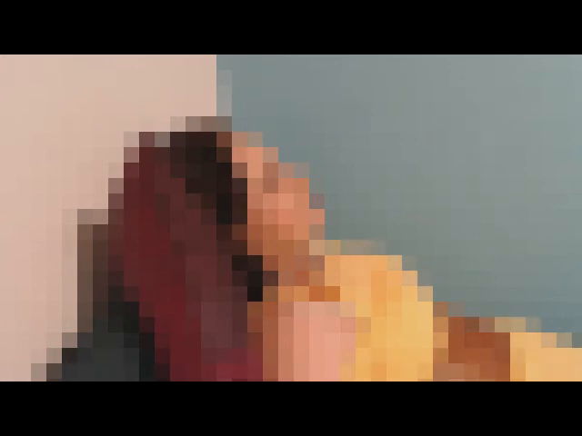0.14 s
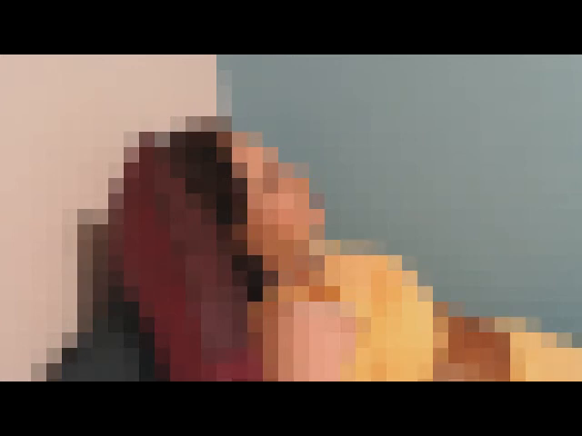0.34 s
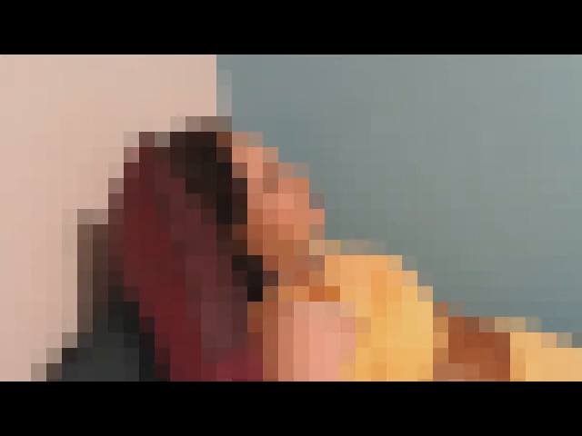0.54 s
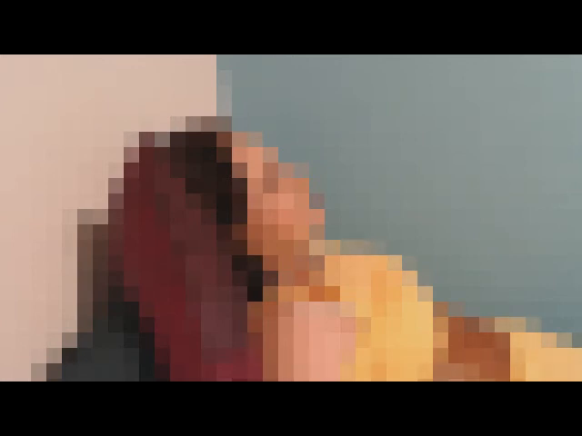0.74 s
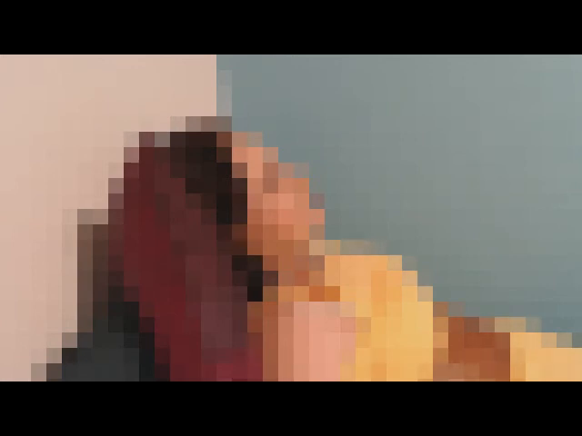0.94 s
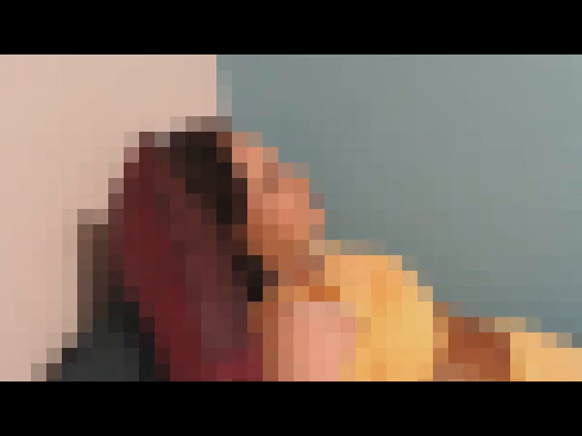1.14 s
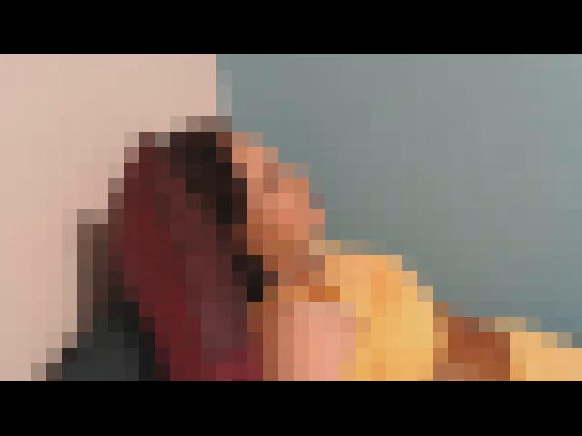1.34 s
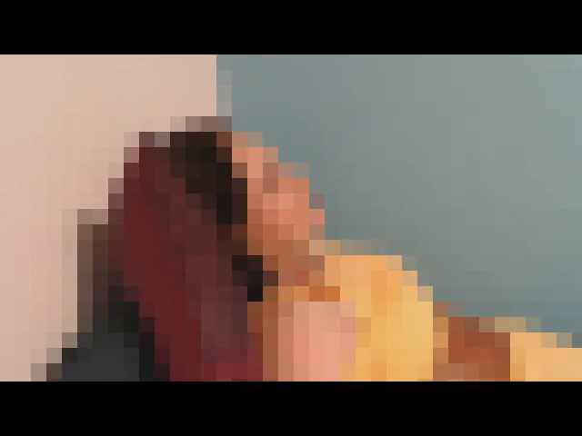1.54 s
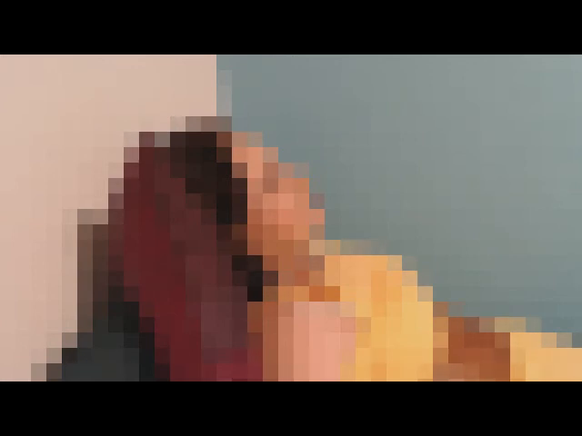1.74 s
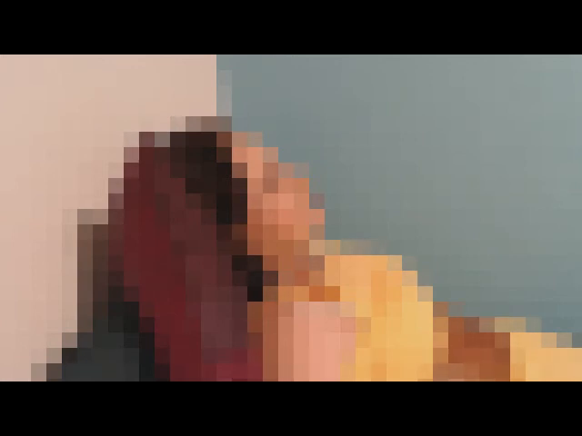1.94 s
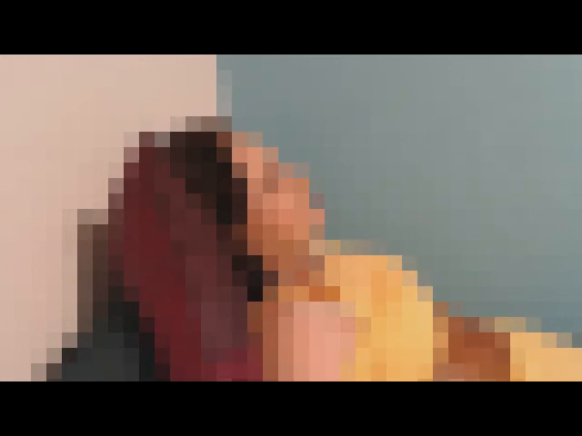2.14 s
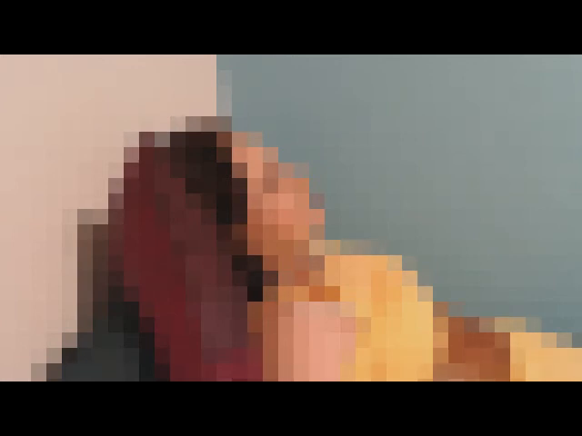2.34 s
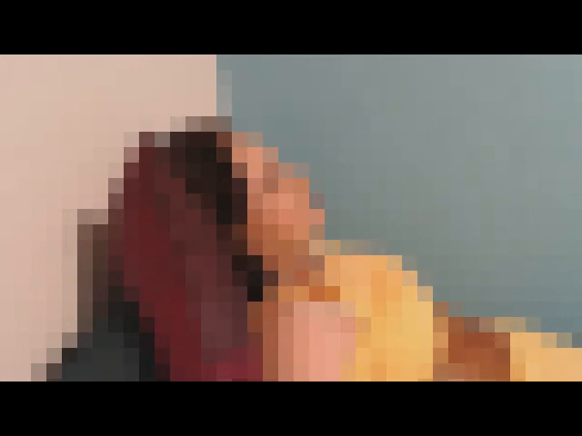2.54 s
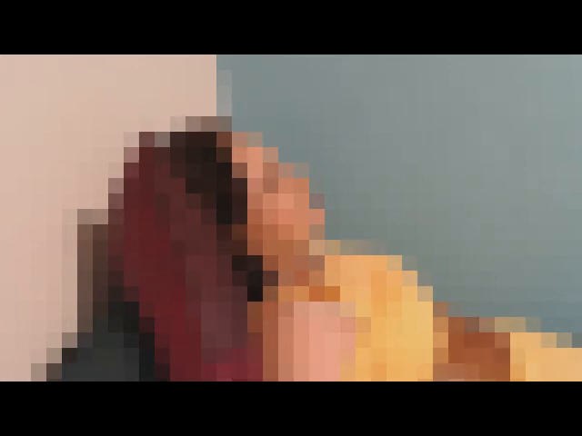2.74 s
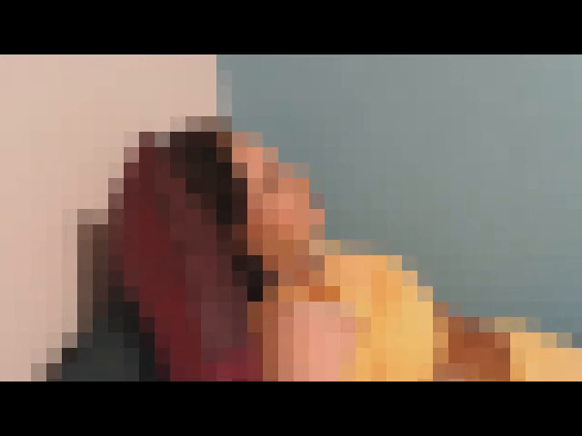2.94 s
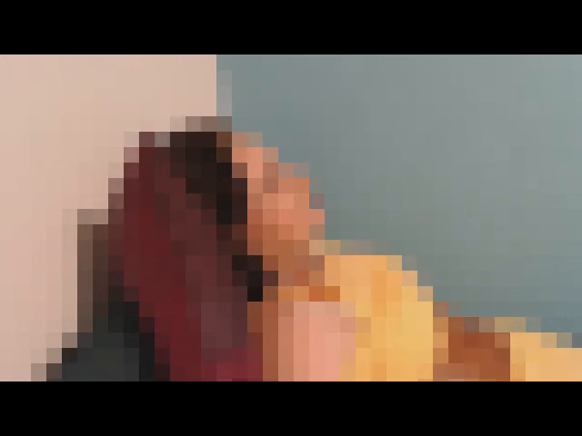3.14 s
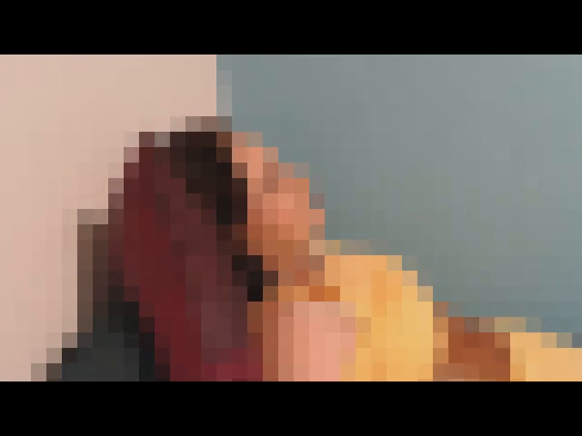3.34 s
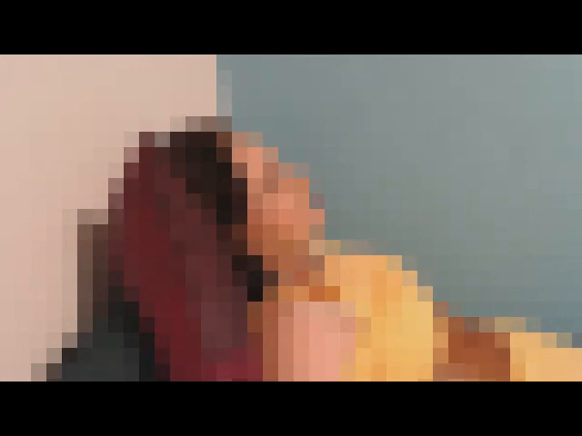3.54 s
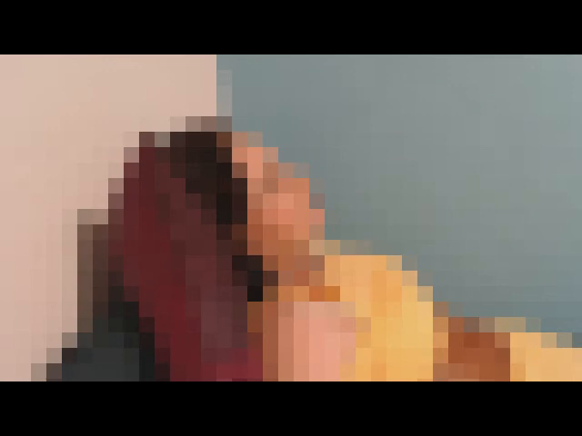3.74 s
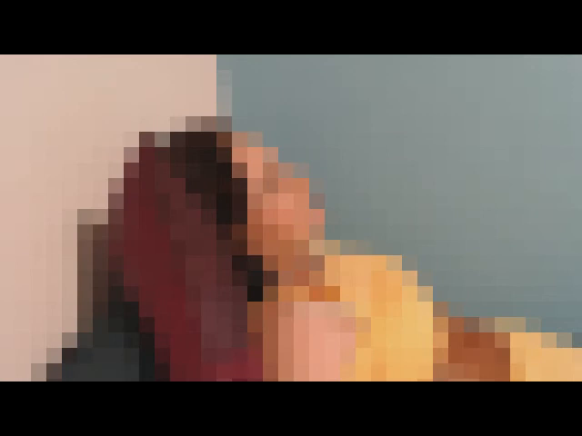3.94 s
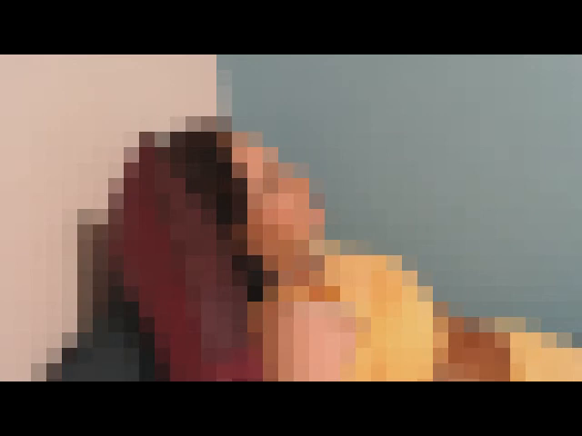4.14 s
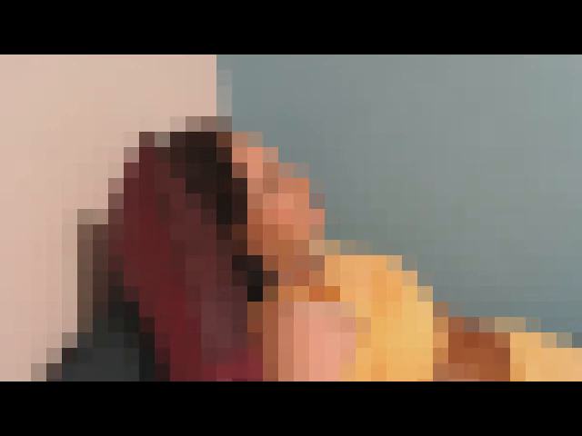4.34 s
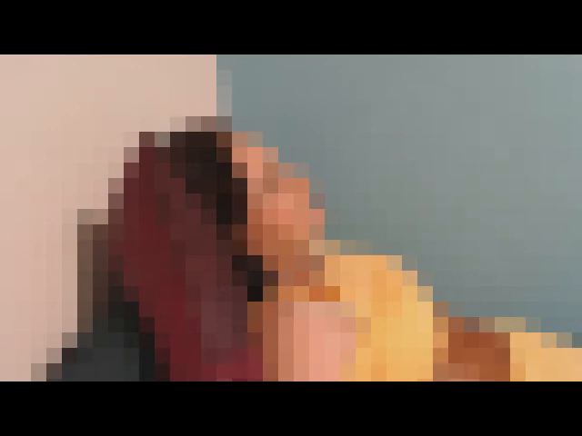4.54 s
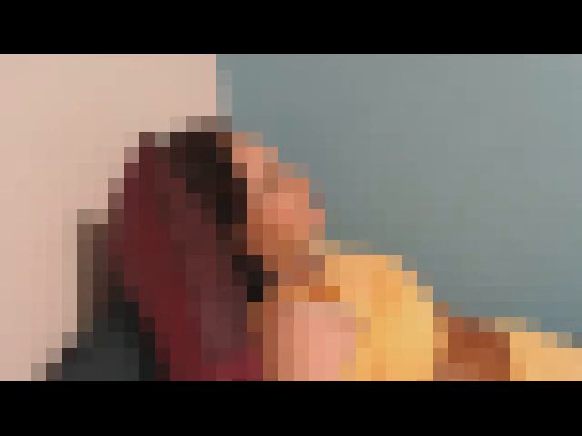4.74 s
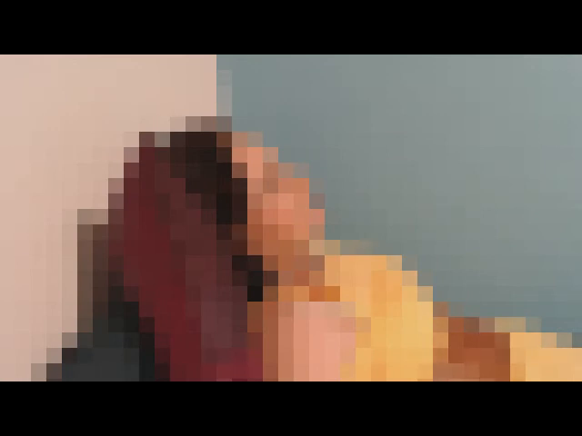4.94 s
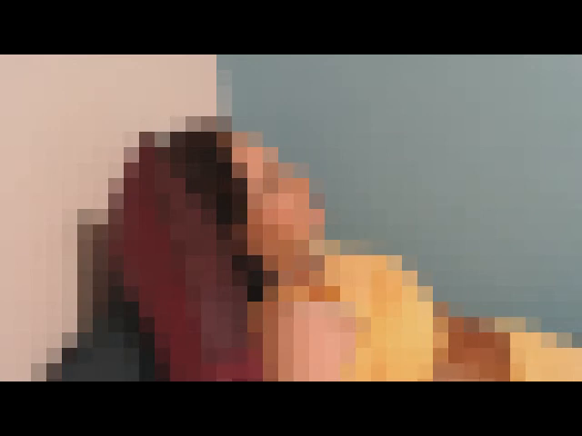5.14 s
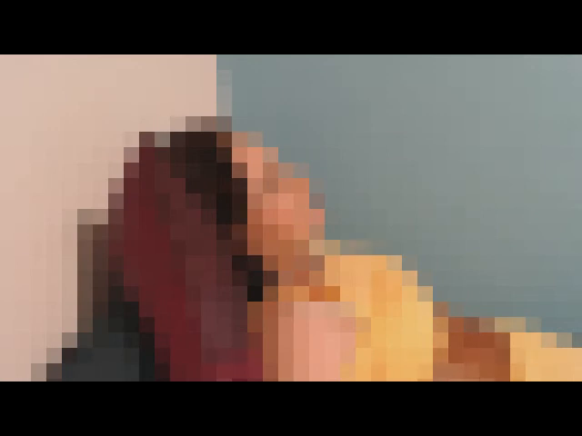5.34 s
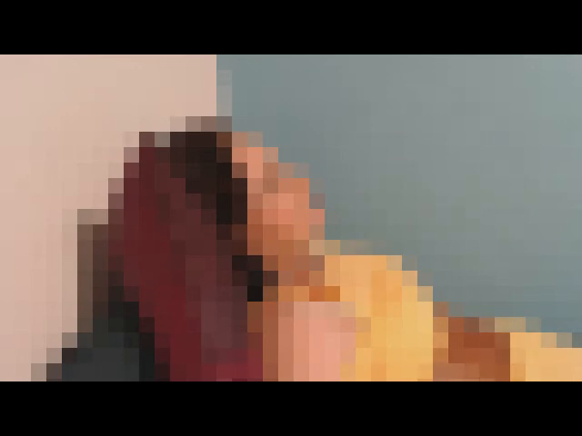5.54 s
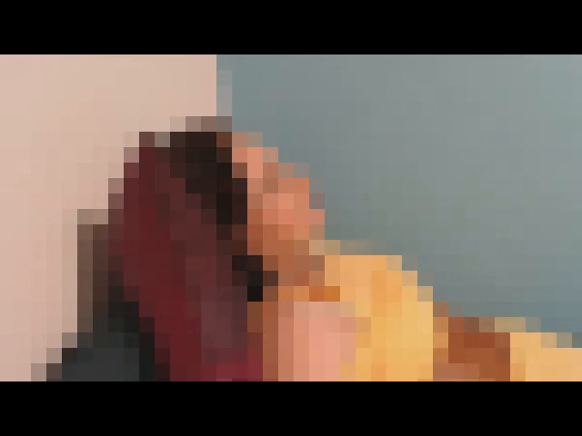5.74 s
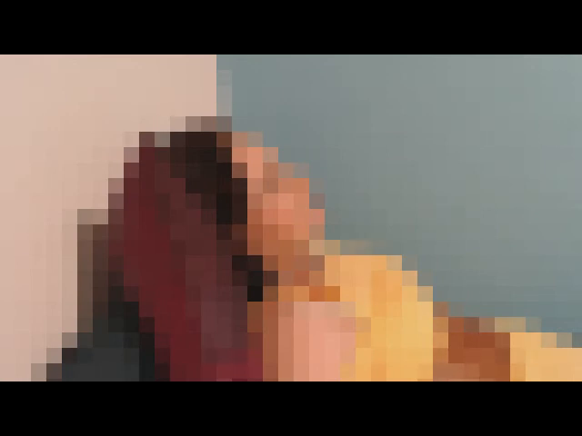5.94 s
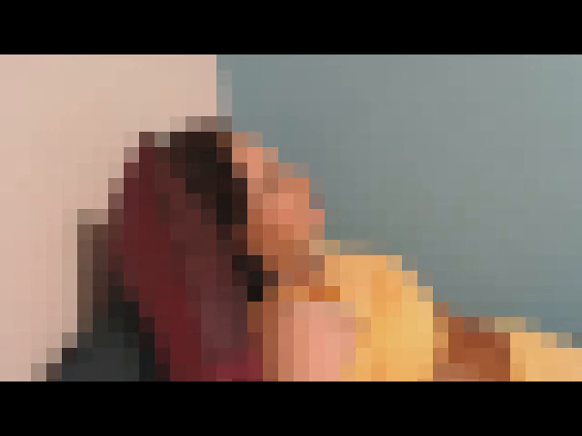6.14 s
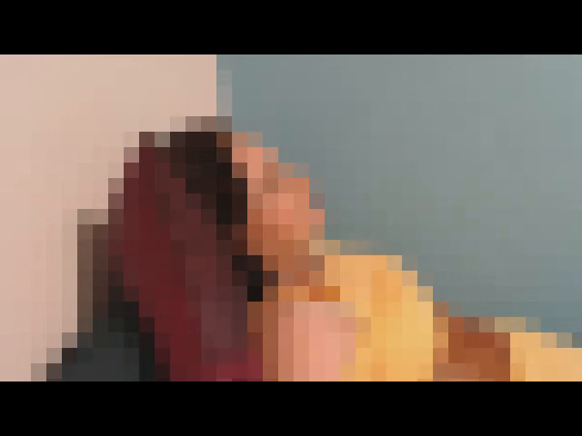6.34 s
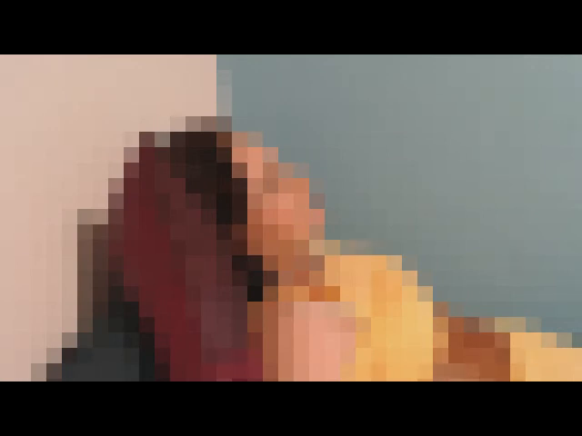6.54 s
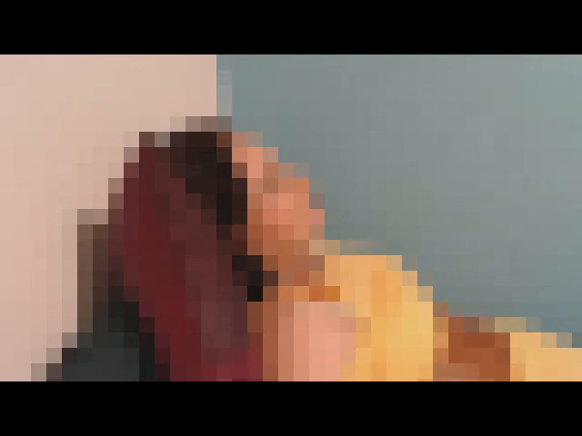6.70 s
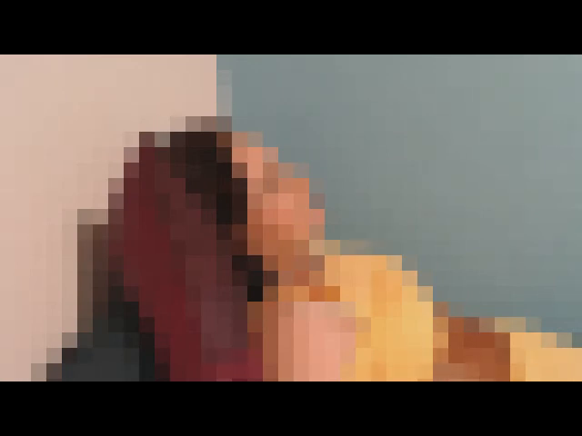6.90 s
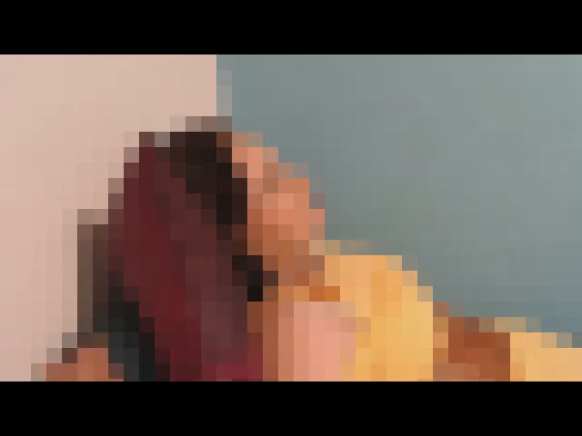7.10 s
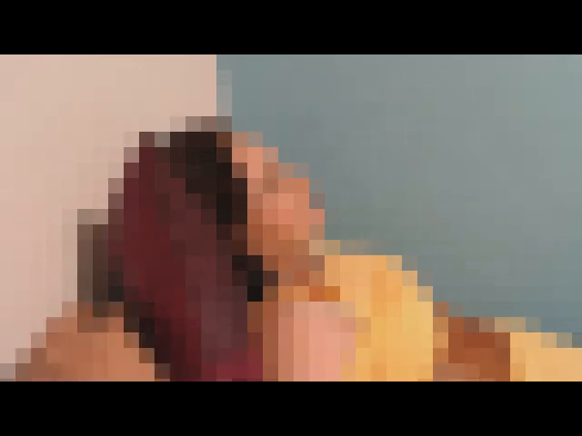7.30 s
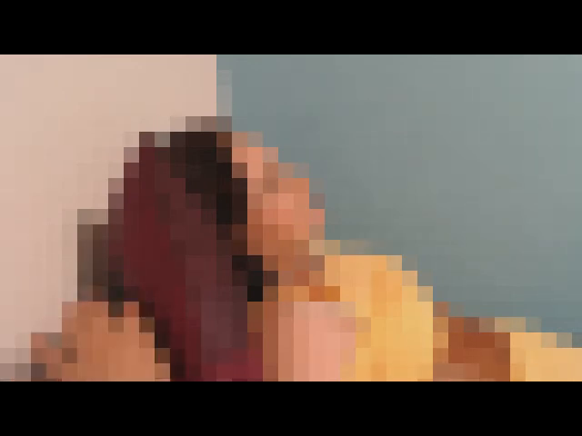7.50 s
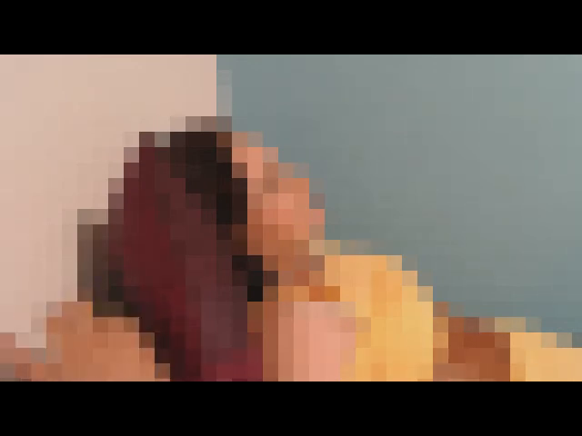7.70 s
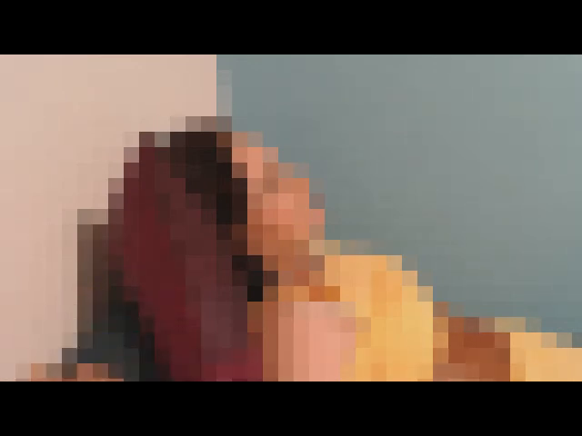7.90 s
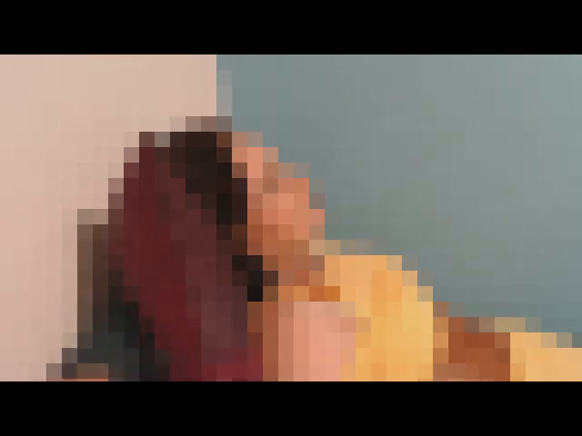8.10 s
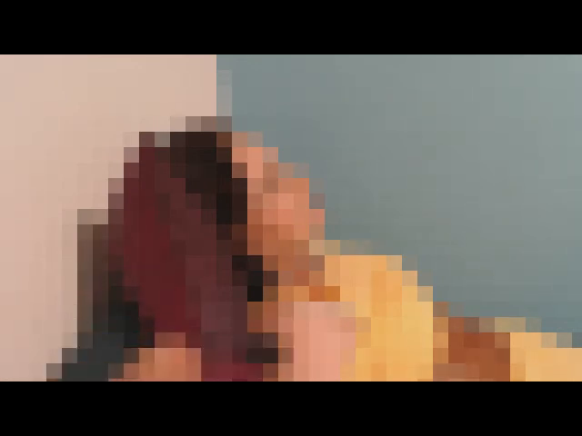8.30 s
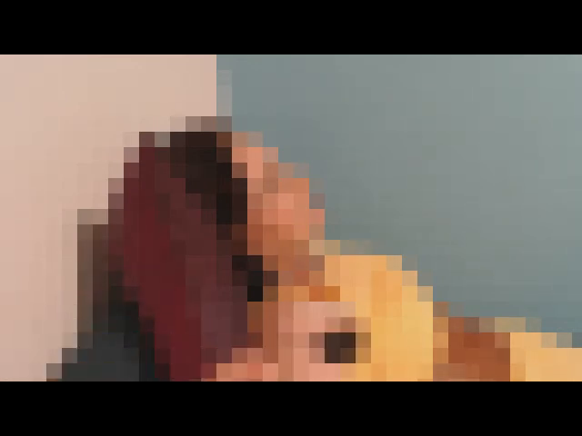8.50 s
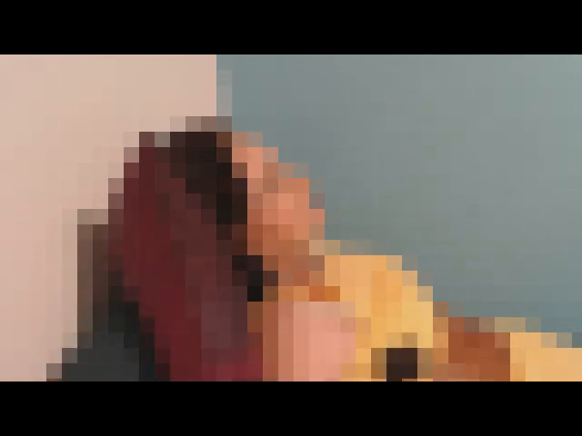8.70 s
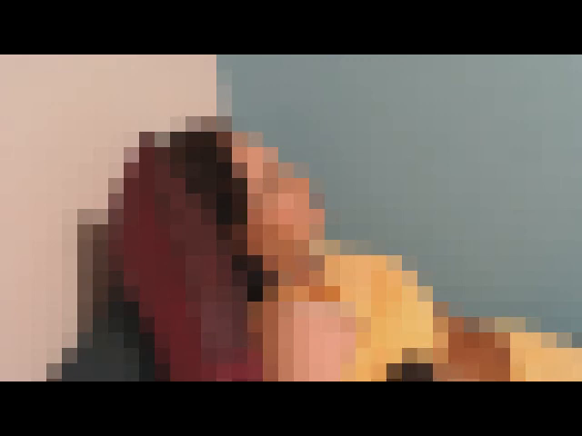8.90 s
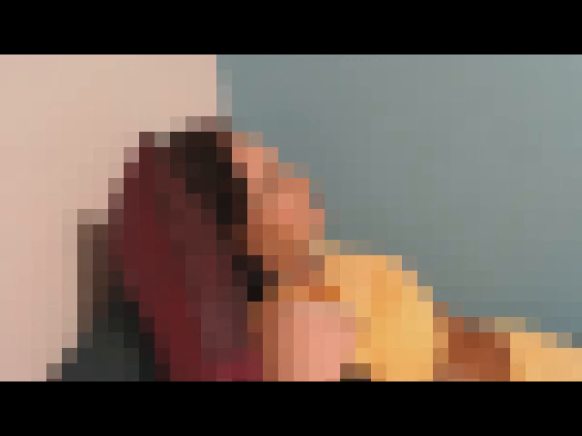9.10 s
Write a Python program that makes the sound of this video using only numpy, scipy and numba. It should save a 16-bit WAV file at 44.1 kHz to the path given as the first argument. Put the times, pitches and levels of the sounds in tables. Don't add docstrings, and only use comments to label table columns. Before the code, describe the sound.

Quiet room drone with faint engine surges; clicking stick-slip creaks slow down, then overloaded rubbing and hard thumps on the microphone's housing.

```python
import sys
import numpy as np
from scipy import signal
from scipy.fft import rfft, irfft
from scipy.io import wavfile
from scipy.ndimage import uniform_filter1d
from numba import njit

SR = 44100
rng = np.random.default_rng(int(sys.argv[2]) if len(sys.argv) > 2 else 0)


def wrap_up_sound(samples):
    columns = np.atleast_2d(samples).T
    tamed = np.clip(columns, -1, 1)
    steps = np.round(tamed * 32767).astype(np.int16)
    wavfile.write(sys.argv[1], SR, steps)


def linear_from_db(decibels):
    return 10 ** (np.asarray(decibels, float) / 20)


N = 403956


def curve(rows, off_db=-90):
    s, *columns = np.transpose(rows)
    t = np.arange(N) / SR
    gate_db = np.interp(t, [s[0] - 0.015, s[0], s[-1], s[-1] + 0.046], [off_db, 0, 0, off_db])
    return [np.interp(t, s, c) for c in columns], gate_db


def spell(start_s, length_s, rise_s, fall_s):
    end_s = start_s + length_s
    corners_s = [start_s - rise_s, start_s, end_s, end_s + fall_s]
    share = np.interp(np.arange(N) / SR, corners_s, [0, 1, 1, 0])
    return np.sin(np.pi / 2 * share) ** 2


def walk(rate_hz):
    k = int(SR / rate_hz)
    held = np.repeat(rng.standard_normal(N // k + 1), k)
    return 0.94 * uniform_filter1d(uniform_filter1d(held, k), k)[:N]


def noise():
    return rng.standard_normal(N)


def level(x, db):
    return x * linear_from_db(db) / np.sqrt(np.mean(x ** 2))


def colour(x, points):
    hz, db = np.transpose(points)
    grid_hz = np.arange(2049) * SR / 4096 + 1
    log_gain = np.interp(np.log(grid_hz), np.log(hz), db) * np.log(10) / 20
    cep = irfft(log_gain)
    cep[1:2048] *= 2
    cep[2049:] = 0
    return signal.fftconvolve(x, irfft(np.exp(rfft(cep))))[:N]


@njit
def svf(x, hz, width):
    low, band, b, l = np.empty(len(x)), np.empty(len(x)), 0., 0.
    for i in range(len(x)):
        g, k = np.tan(np.pi * hz[i] / SR), width[i] / hz[i]
        v = (b + g * (x[i] - l)) / (1 + g * (g + k))
        low[i], band[i] = l + g * v, k * v
        b, l = 2 * v - b, l + 2 * g * v
    return low, band


def ring(x, hz, width_hz):
    return svf(x, np.full(N, 1. * hz), np.full(N, 1. * width_hz))[1]


def add(out, s, shape):
    i = int(s * SR)
    out[i:i + len(shape)] += shape[:N - i]


def thud(hz, t60, fall, fall_s, contact_s=0.00056):
    t = np.arange(9000) / SR
    phase = 2 * np.pi * np.cumsum(hz * (1 + fall * np.exp(-t / fall_s))) / SR
    return np.sin(phase) * (1 - np.exp(-t / contact_s)) * linear_from_db(-60 * t / max(t60, 0.005))


# t/s, pressure level/dB, drag brightness f/Hz, speed/0-1
RUB = [
    (7.553, -7.5, 150, 0),
    (7.61, -1.5, 170, 0.21),
    (7.7, 3, 355, 0.07),
    (7.8, 0.5, 237, 0.04),
    (7.89, 22.5, 285, 0.36),
    (8.0, 15, 300, 0.61),
    (8.065, 17, 284, 0.81),
    (8.088, 5, 185, .9),
    (8.1, -8, 110, 0.5),
]
SCRAPE_SLOW_HZ, SCRAPE_FAST_HZ = 700, 1590
SCRAPE_DB, SCRAPE_DB_PER_OCTAVE, SCRAPE_SPEED_DB = -15, 1.5, 8.5


def rub():
    (press_db, bright_hz, speed), gate_db = curve(RUB)
    scrape_hz = SCRAPE_SLOW_HZ * (SCRAPE_FAST_HZ / SCRAPE_SLOW_HZ) ** speed
    scrape_db = SCRAPE_DB + SCRAPE_SPEED_DB * speed + SCRAPE_DB_PER_OCTAVE * np.log2(bright_hz / 300)
    jerks = noise() * linear_from_db(1.5 * walk(60))
    drag = svf(jerks, bright_hz, 1.3 * bright_hz)[0] / np.sqrt(bright_hz / 9000)
    drag = svf(drag, 2.65 * bright_hz, 2.46 * bright_hz)[0]
    drag = drag - svf(drag, np.full(N, 45.), np.full(N, 70.))[0] - ring(drag, 45, 70)
    streaks = noise() * linear_from_db(3.7 * walk(160) + 3.3 * walk(35))
    scrape = svf(streaks, scrape_hz, 0.95 * scrape_hz)[1]
    scrape = 3.34 * svf(scrape, scrape_hz, 1.32 * scrape_hz)[1]
    swish = ring(noise(), 6500, 7000)
    return linear_from_db(press_db + gate_db) * (drag + linear_from_db(scrape_db) * (scrape + linear_from_db(-21.5) * swish))


# t/s, sway level/dB, finger friction level/dB
GRIP = [
    (8.1, -11, 14),
    (8.19, -23.5, -3),
    (8.38, -18, 5.5),
    (8.6, -19.5, 2),
    (8.77, -30, -0.5),
    (8.86, -17, -2),
    (8.93, -21, 3),
    (9.03, -18, 11),
    (9.16, -22, -9),
]
RUMBLE_DB, SKIN_DB = -30, -45.5


def grip():
    (sway_db, friction_db), gate_db = curve(GRIP)
    sway = level(ring(ring(noise(), 27, 40), 29, 40), 0)
    rumble = level(ring(ring(ring(noise(), 103, 130), 110, 130), 117, 150), 0)
    skin = ring(ring(noise(), 540, 420), 440, 2600)
    skin = level(skin * linear_from_db(4.3 * walk(120)), 0)
    friction = linear_from_db(RUMBLE_DB) * rumble + linear_from_db(SKIN_DB) * skin
    return linear_from_db(gate_db) * (linear_from_db(sway_db) * sway + linear_from_db(friction_db) * friction)


# t/s, peak level/dB, f/Hz, pushed +1 or pulled -1
KNOCKS = [(7.552, 12.5, 320, 1), (7.559, 2.5, 69.5, 1), (7.582, -1, 75, 1), (7.603, 8, 182, -1),
          (8.098, -3, 107, 1), (8.108, -1.5, 60, 1), (8.126, -9, 149, -1), (8.142, -5, 171, -1),
          (8.162, -11, 143, -1), (8.241, -11, 108, -1), (8.327, -11, 153, -1), (8.335, 1.5, 138, 1),
          (8.414, -1.5, 90.5, -1), (8.537, -9, 124, -1), (8.553, -3.5, 127, -1), (8.581, 13, 139.4, -1),
          (8.622, -22, 105, 1), (8.697, -2.5, 124, 1), (8.75, -6, 117, 1), (8.814, -8, 98, 1),
          (8.826, 4.5, 137, 1), (8.93, 8, 125.6, -1), (8.944, 0.5, 71.5, 1), (8.969, 25.5, 125.5, 1),
          (8.983, 21.5, 213, -1), (8.992, 16.5, 108.5, 1), (9.005, 6, 35.8, -1), (9.039, 2, 133, 1),
          (9.072, -9, 70, -1), (9.098, -5.5, 128, 1)]
KNOCK_RING_TURNS = 5.4
CONTACT_S, SOFTER_PER_DB = 0.0011, 0.14


def knocks():
    out = np.zeros(N)
    for s, db, hz, swing in KNOCKS:
        contact_s = CONTACT_S * linear_from_db(-SOFTER_PER_DB * db)
        swings = thud(hz, KNOCK_RING_TURNS / hz, fall=0.55, fall_s=0.0019, contact_s=contact_s)
        add(out, s, np.sign(swing) * linear_from_db(db) * swings)
    return out


# t/s, peak level/dB, f/Hz
TAPS = [(3.322, -22, 516), (3.964, -22, 544), (6.377, -31, 450), (6.401, -24.5, 650), (7.551, -18, 590),
        (7.601, -8, 600), (8.14, -18, 700), (8.245, -3.5, 610), (8.254, -20, 640), (8.331, -10, 292),
        (8.382, -11.5, 600), (8.416, -13.5, 700), (8.434, -16, 600), (8.622, -32, 560), (8.692, -14, 475),
        (8.744, -21, 470), (8.808, -27, 500), (8.825, -11, 380), (8.932, -12, 423), (9.039, -14, 510)]
TAP_RING_TURNS, TAP_OVERTONE, TAP_OVERTONE_DB, TAP_CRACK_DB = 9.4, 2.02, -13.5, -9.5


def taps():
    out, t = np.zeros(N), np.arange(400) / SR
    for s, db, hz in TAPS:
        for ratio, mode_db in ((1, 0), (TAP_OVERTONE, TAP_OVERTONE_DB)):
            mode = thud(ratio * hz, TAP_RING_TURNS / hz, fall=0.15, fall_s=0.0011)
            add(out, s, linear_from_db(db + 4.5 + mode_db) * mode)
        rough = rng.standard_normal(len(t)) * np.exp(-t / 0.0022)
        crack = svf(rough, np.full(len(t), 1.1 * hz), np.full(len(t), 1.4 * hz))[0]
        add(out, s, linear_from_db(db + TAP_CRACK_DB) * crack / np.abs(crack).max())
    return out


# t/s, peak level/dB, f/Hz
TICKS = [(5.927, -34, 9000), (5.941, -40, 8800), (6.541, -32, 5030), (7.781, -14, 1790), (8.106, -23, 1500),
         (8.127, -22.5, 1000), (8.185, -28, 1500), (8.196, -24, 1560), (8.205, -34, 1490),
         (8.305, -44, 8000), (8.338, -28, 1500), (8.346, -14, 8400), (8.412, -21, 6860), (8.245, -35, 2480),
         (8.581, -12, 1260), (8.67, -40, 2500), (8.686, -29, 6000)]
TICK_S = 0.0044
# t/s, peak level/dB, f/Hz, length/s
BRUSHES = [
    (3.173, -41, 7000, .04),
    (6.542, -18, 380, .015),
    (6.544, -36, 6000, .035),
    (8.348, -33, 2500, .013),
    (8.422, -30.5, 5060, .033),
    (8.826, -23.5, 690, 0.013),
    (9.047, -36.5, 5000, 0.066),
    (9.098, -38.5, 4530, 0.071),
    (9.144, -34, 1800, .03),
]


def ticks():
    out, t = np.zeros(N), np.arange(2000) / SR
    for s, db, hz, length_s in [(*row, TICK_S) for row in TICKS] + list(BRUSHES):
        centre = np.full(len(t), 1. * hz)
        tick = rng.standard_normal(len(t)) * np.exp(-(t / length_s) ** 1.5)
        for _ in range(3):
            tick = svf(tick, centre, 1.7 * centre)[1]
        add(out, s, linear_from_db(db) * tick / np.abs(tick).max())
    return out


# t/s, peak level/dB, top minus middle/dB
SLIPS = [(6.545, -37, 3), (6.586, -18, -4), (6.6568, -10, -18), (6.7059, -7.5, -17), (6.7208, -5, -23),
         (6.7592, -6.5, -14), (6.79, -14, -12), (6.8236, -7, -9), (6.8736, -5.5, -6), (6.9252, -9, -2.5),
         (7.0227, -9, 0), (7.0765, -10.5, -6), (7.1504, -11, -0.5), (7.228, -10.5, -3), (7.3398, -11, -8),
         (7.492, -7.5, -6.5)]
# delay/s, level/dB
ECHOES = [(0.018, -17), (0.026, -18), (.041, -19)]
# t/s, level/dB
STRAIN = [
    (6.33, -30),
    (6.53, -22.5),
    (6.6, -2.5),
    (6.72, -1.5),
    (6.87, -8),
    (7.02, -14.5),
    (7.5, -25.5),
]
# f/Hz, level/dB per Hz
MOUNT = [(88, -14), (150, -18), (205, 7.5), (264, -6), (354, 1.5), (466, -17.5), (514, -7), (837, -11),
         (1240, -12.5), (1830, -19), (2920, -14.5), (4580, -20), (6770, -19), (10600, -30), (16000, -32)]
# f/Hz, width/Hz, level/dB
MOUNT_RINGS = [(1150, 440, 0), (3530, 680, -9.5), (6800, 900, -9), (8000, 420, -12), (10600, 1300, -2),
               (13800, 600, -2)]
TAIL_T60_S, TREBLE_T60_S, TAIL_DB = 0.77, 0.22, -14
BREAKS_FREE_S = 6.587
GRIND_DB, BODY_DB, BODY_SHARE, BODY_HZ, ROCK_DB, ROCK_SHARE = -24.5, -25, 0.57, 327, -39, 0.15


def mount():
    (strain_db,), gate_db = curve(STRAIN)
    t = np.arange(int(0.5 * SR)) / SR
    burst = np.exp(-(t / 0.0059) ** 1.9)
    echoes = sum(linear_from_db(db) * np.exp(-((t - delay_s) / 0.0096) ** 2) for delay_s, db in ECHOES)
    late = linear_from_db(TAIL_DB) * (1 - np.exp(-(t / 0.0079) ** 2))
    wide_shape = burst + echoes + late * linear_from_db(-60 * t / TAIL_T60_S)
    top_shape = burst + echoes + late * linear_from_db(-60 * t / TREBLE_T60_S)
    wide, top = np.zeros(N), np.zeros(N)
    for s, db, top_db in SLIPS:
        rough = rng.standard_normal((2, len(t))) * linear_from_db(db - 8.5)
        add(wide, s, rough[0] * wide_shape)
        add(top, s, rough[1] * linear_from_db(top_db + 7) * top_shape)
    slips = wide - 0.47 * ring(wide, 16000, 12000) + ring(top, 9700, 12000)

    grains = noise() * linear_from_db(2.4 * rng.exponential(size=N) + 2.2 * walk(500))
    unit = np.std(colour(grains, MOUNT))
    grind = grains - 0.5 * ring(grains, 15000, 9000)
    grind = grind * linear_from_db(GRIND_DB + strain_db + gate_db) * spell(BREAKS_FREE_S, 0.81, 0.0033, 0.01)

    near = colour(slips + grind, MOUNT) / unit * linear_from_db(2.5)
    near = near - 0.5 * ring(near, 14200, 5000)
    near = near + sum(linear_from_db(db) * ring(near, hz, width_hz) for hz, width_hz, db in MOUNT_RINGS)

    body = level(ring(noise(), BODY_HZ, 195), 0)
    body = body * linear_from_db(BODY_DB + BODY_SHARE * strain_db + gate_db + 2 * walk(40))
    rock = level(ring(ring(noise(), 51, 110), 55, 120), 0)
    rock = rock * linear_from_db(ROCK_DB + ROCK_SHARE * strain_db + gate_db)
    return near + body + rock


# t/s, cycle rate f/Hz
SPEED = [(0, 34.4), (1.6, 34.4), (2.5, 33.4), (2.75, 34.7), (3.28, 34.5), (3.6, 35.7), (3.95, 38.8),
         (4.3, 40.4), (4.45, 42.2), (4.8, 43.6), (5.27, 50.4), (5.95, 53.6)]
# start t/s, length/s, 2nd multiple level/dB, 3rd multiple level/dB
SURGES = [
    (0.303, 0.99, -45, -37),
    (2.553, 0.21, -31.5, -53),
    (2.82, .14, -36, -34.5),
    (3.11, 0.031, -30, -33),
    (3.292, 0.33, -28.5, -34),
    (3.545, 0.12, -31, -39),
    (3.78, 0.095, -28.5, -29.5),
    (4.0, 0.24, -32.5, -42),
    (4.46, 0.31, -29.5, -39),
    (5.297, 0.35, -32.5, -54),
]
FOURTH_DB, SURGE_RISE_S, SURGE_FALL_S = -13, 0.11, 0.12


def engine():
    (cycle_hz,), _ = curve(SPEED)
    phase = 2 * np.pi * np.cumsum(cycle_hz * (1 + 0.014 * walk(17))) / SR
    size = np.zeros((3, N))
    for s, length_s, second_db, third_db in SURGES:
        multiples_db = np.array([[second_db], [third_db], [second_db + FOURTH_DB]])
        size += linear_from_db(multiples_db) * spell(s, length_s, SURGE_RISE_S, SURGE_FALL_S)
    out = np.zeros(N)
    for multiple, a in zip((2, 3, 4), size):
        out += np.sqrt(2) * a * linear_from_db(3.5 * walk(9.2)) * np.sin(multiple * phase)
    return out


# f/Hz, level/dB per Hz
ROOM = [(12, -42), (20, -8.5), (90, -4), (162, -6.5), (227, -2), (326, -9.5), (386, -8), (443, -13),
        (496, -9.5), (603, -17), (1080, -24.5), (2300, -32.5), (9300, -40.5), (14100, -44.5), (15800, -51)]
ROOM_DB = -30.5
# f/Hz, width/Hz
HUM = [(221, 6), (250, 4), (121, 4), (103, 5)]
HUM_DB = [-38.5, -46, -42.5, -43.5]
HUM_WANDER_DB = 2
# t/s, peak level/dB, f/Hz
BUMPS = [(0.539, -17, 215), (1.118, -16, 214), (1.184, -17, 222), (1.885, -16.5, 207), (3.149, -15.5, 199),
         (3.322, -15, 152), (3.963, -29, 226), (4.832, -31, 221.6), (5.305, -27, 215), (6.378, -22, 270.3),
         (6.399, -28, 215)]


def room():
    air = level(colour(noise(), ROOM), 0)
    air = air + ring(air, 100, 430) * (linear_from_db(0.5 * walk(6.5)) - 1)
    out = air * linear_from_db(ROOM_DB - 1.5)
    for (hz, width_hz), db in zip(HUM, HUM_DB):
        hum = level(ring(ring(noise(), hz, width_hz), hz, width_hz), 0)
        out += linear_from_db(db + HUM_WANDER_DB * walk(0.943)) * hum
    for s, db, hz in BUMPS:
        add(out, s, linear_from_db(db + 5.5) * thud(hz, t60=0.012, fall=0.12, fall_s=0.0045))
    return out


def scene():
    hand = rub() + grip() + knocks() + taps() + ticks()
    return (hand + mount() + engine() + room())[None]


def band_limit(x):
    return signal.sosfilt(signal.butter(12, 16370, fs=SR, output="sos"), x)


LIMIT, TOP_HZ = 0.7, 15750


def record(dry):
    flat = dry / (1 + np.abs(dry / LIMIT) ** 30.) ** (1 / 30.)
    top_cut = signal.ellip(10, 0.1, 60, TOP_HZ, fs=SR, output="sos")
    mix = signal.sosfiltfilt(top_cut, flat)
    return band_limit(mix)


dry = scene()
out = record(dry)
wrap_up_sound(out)
```